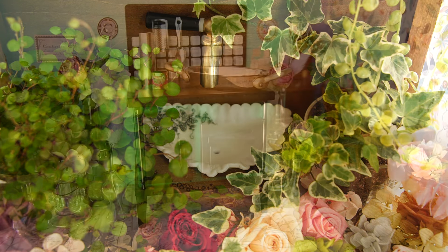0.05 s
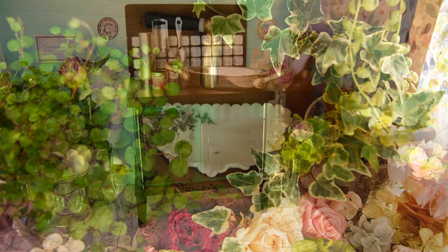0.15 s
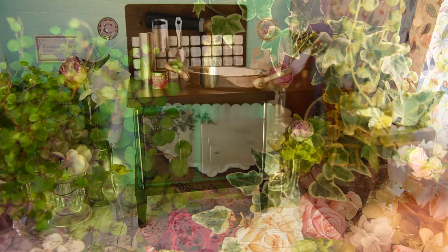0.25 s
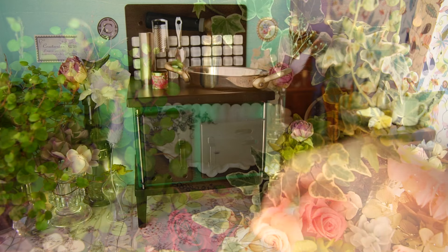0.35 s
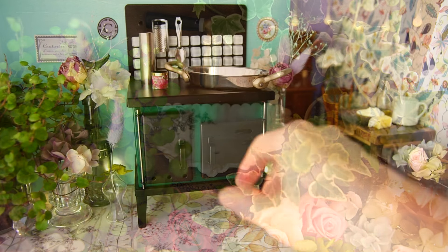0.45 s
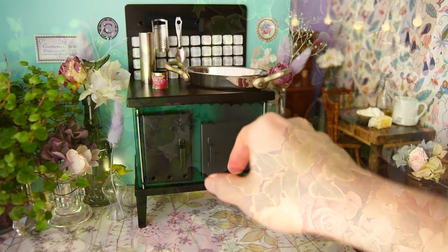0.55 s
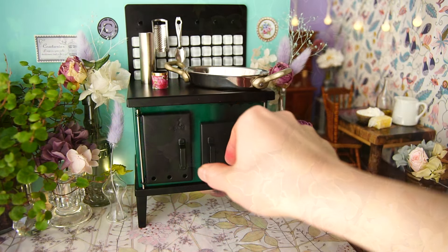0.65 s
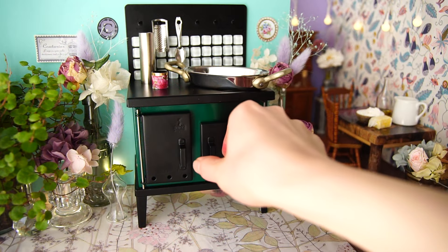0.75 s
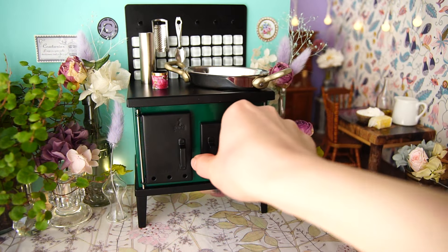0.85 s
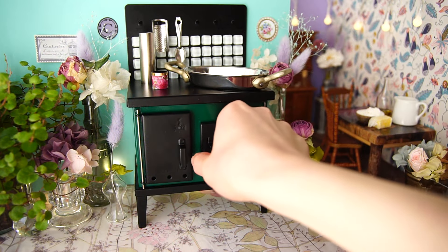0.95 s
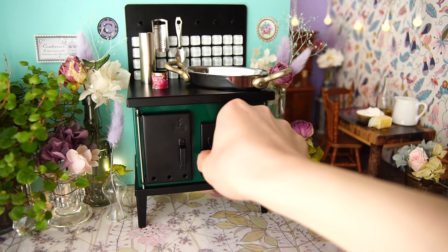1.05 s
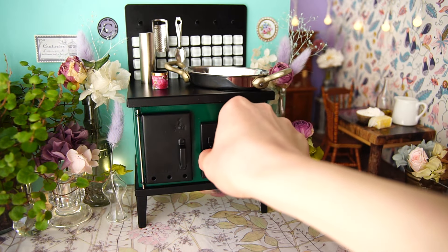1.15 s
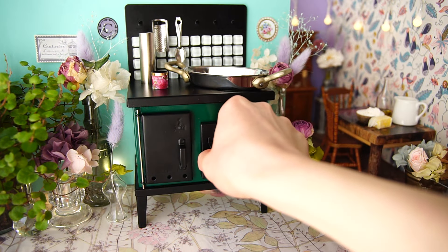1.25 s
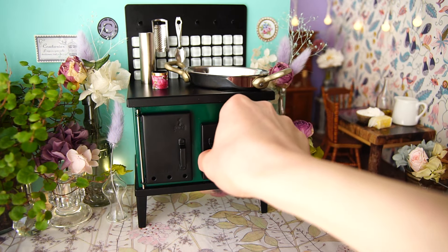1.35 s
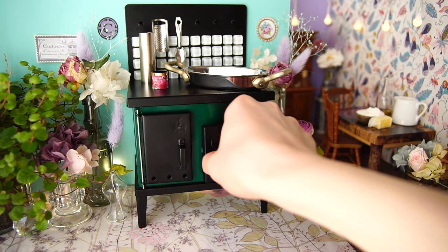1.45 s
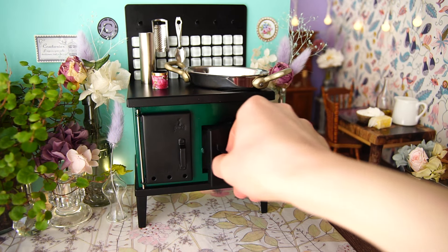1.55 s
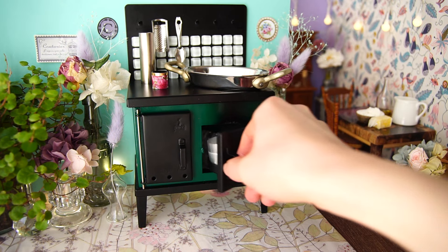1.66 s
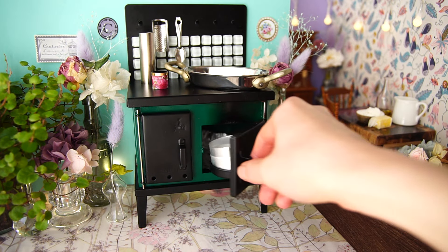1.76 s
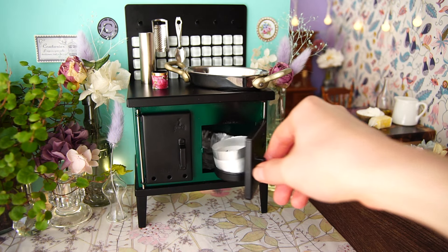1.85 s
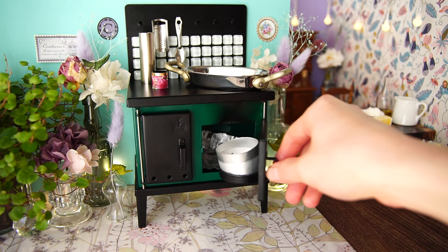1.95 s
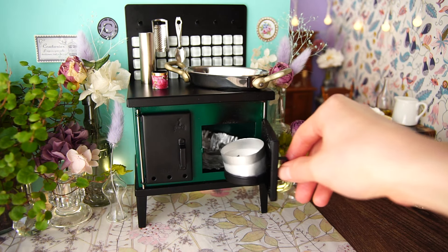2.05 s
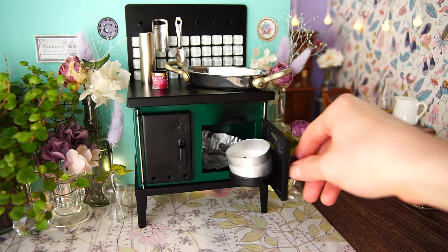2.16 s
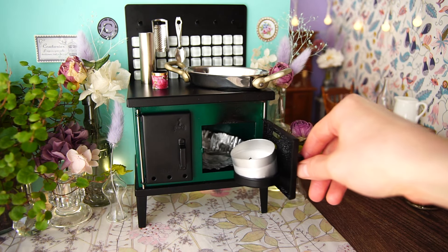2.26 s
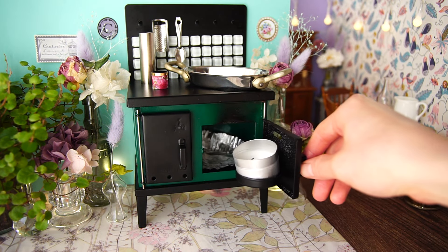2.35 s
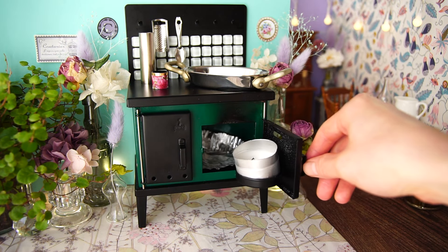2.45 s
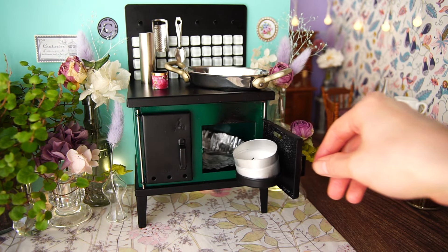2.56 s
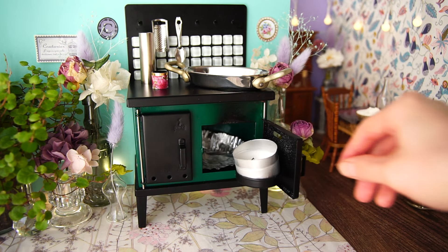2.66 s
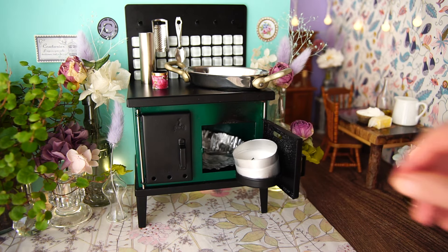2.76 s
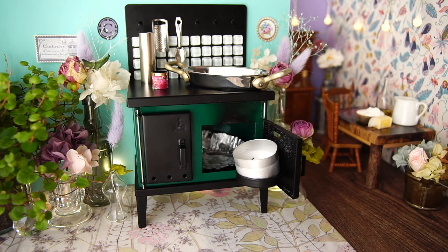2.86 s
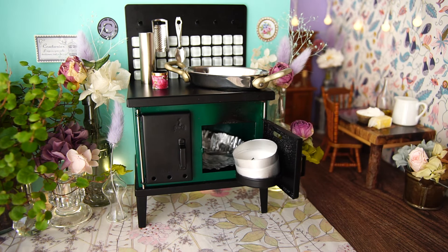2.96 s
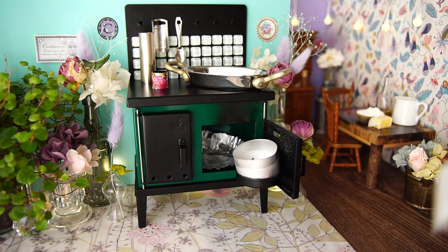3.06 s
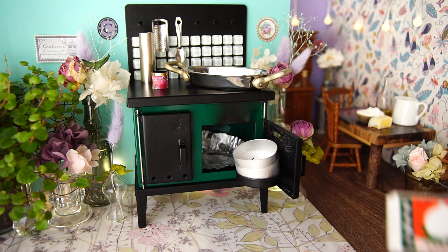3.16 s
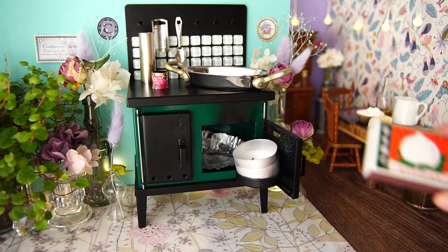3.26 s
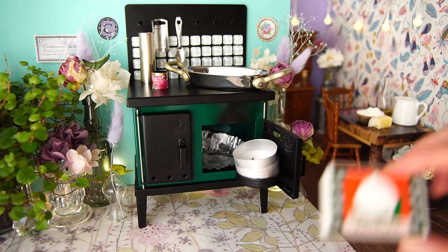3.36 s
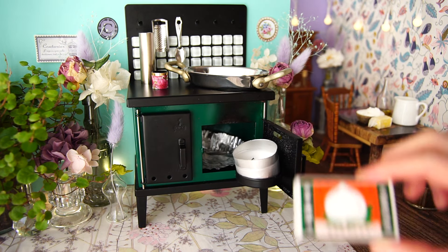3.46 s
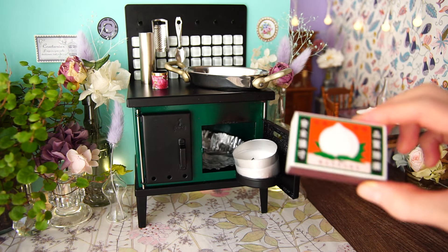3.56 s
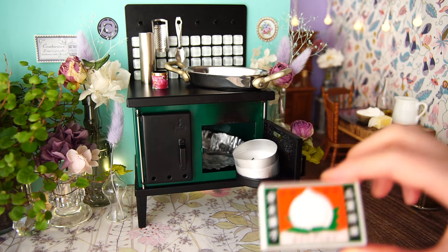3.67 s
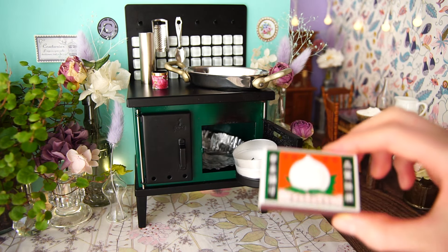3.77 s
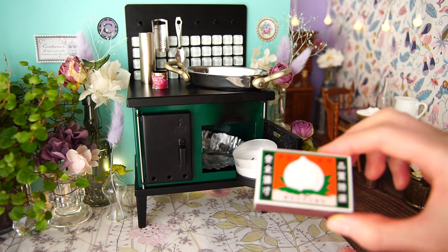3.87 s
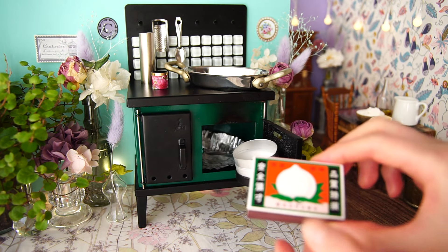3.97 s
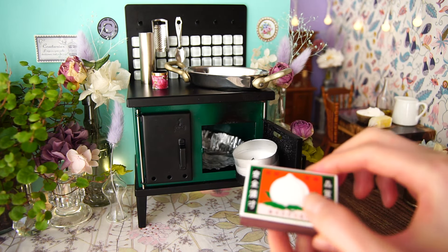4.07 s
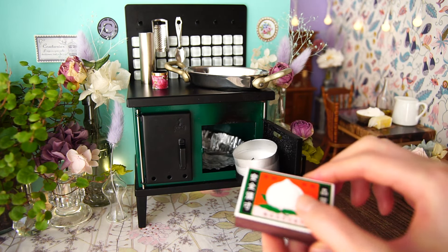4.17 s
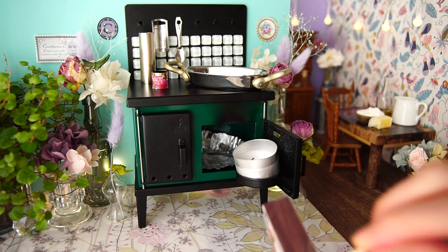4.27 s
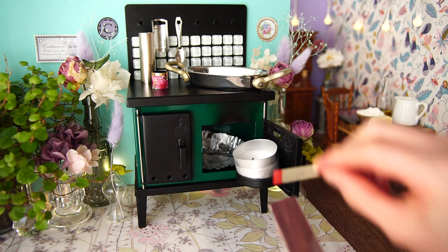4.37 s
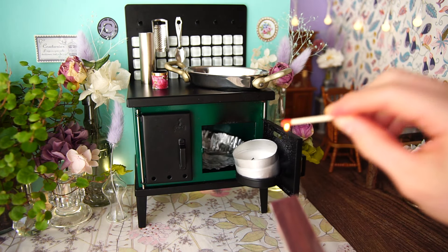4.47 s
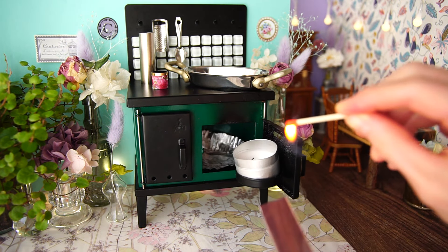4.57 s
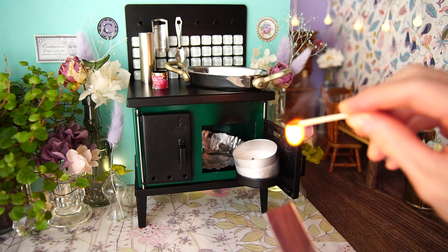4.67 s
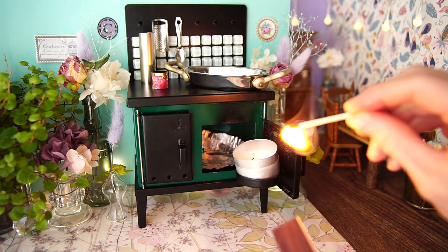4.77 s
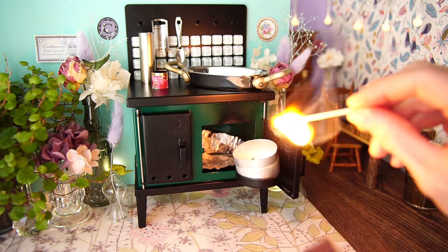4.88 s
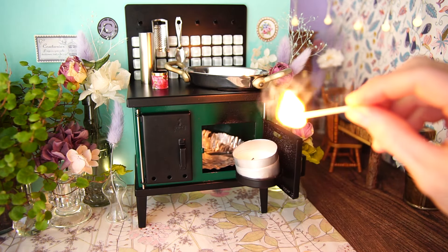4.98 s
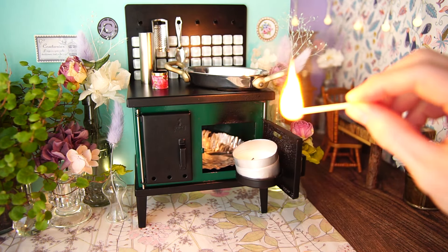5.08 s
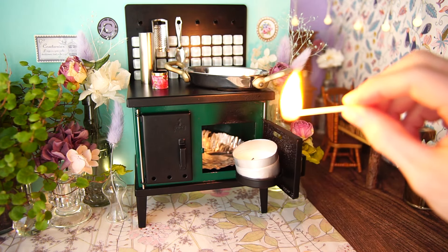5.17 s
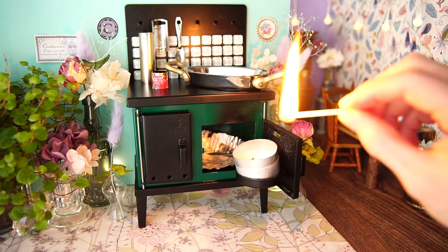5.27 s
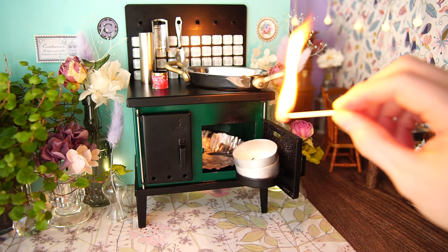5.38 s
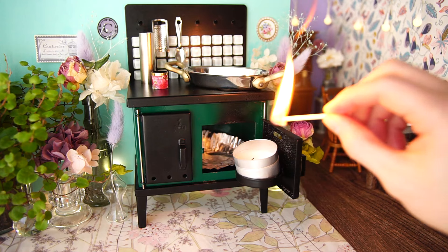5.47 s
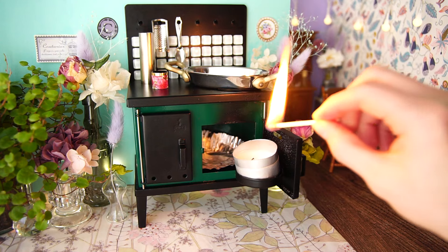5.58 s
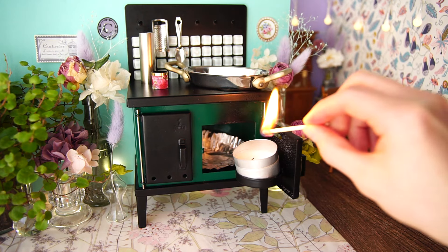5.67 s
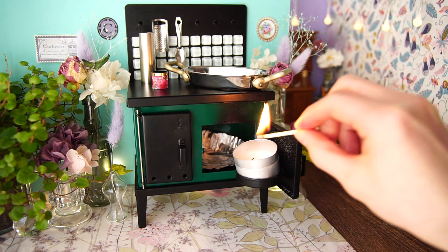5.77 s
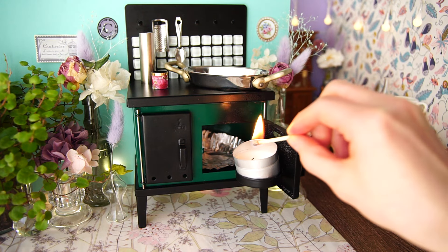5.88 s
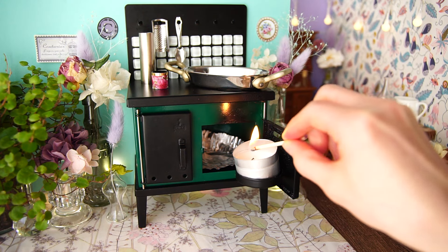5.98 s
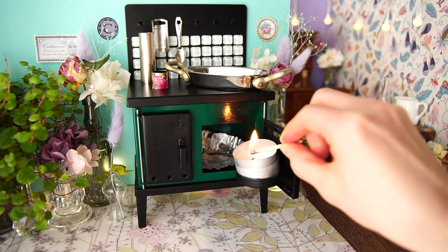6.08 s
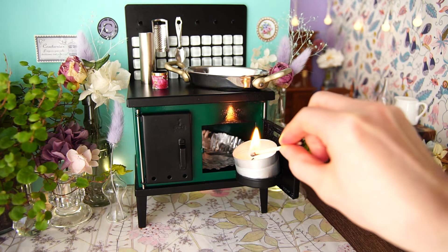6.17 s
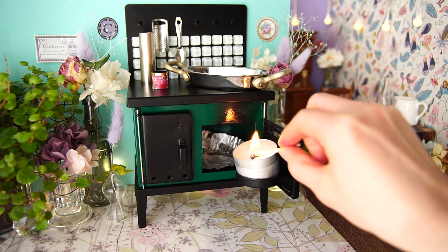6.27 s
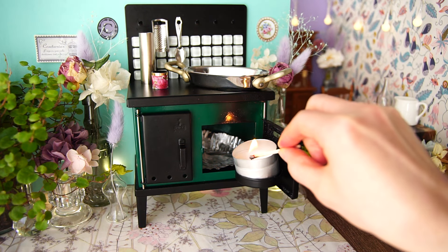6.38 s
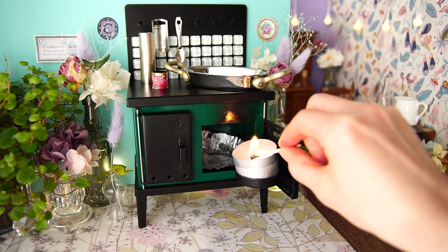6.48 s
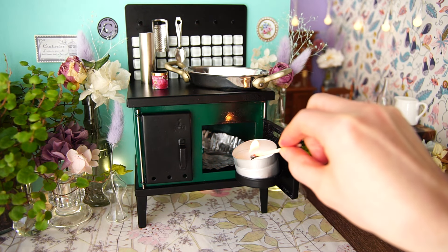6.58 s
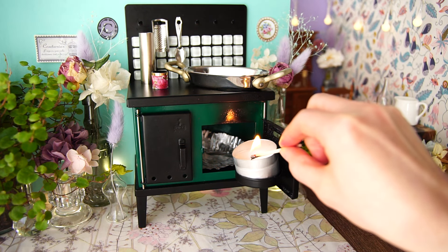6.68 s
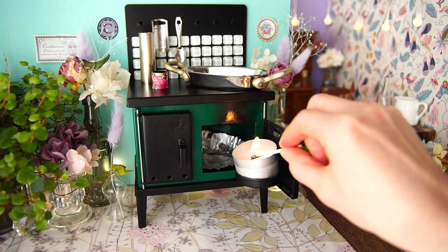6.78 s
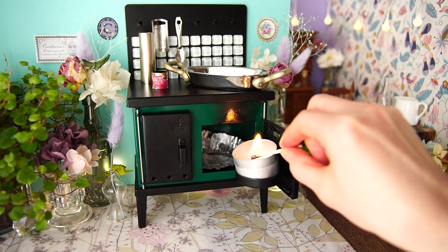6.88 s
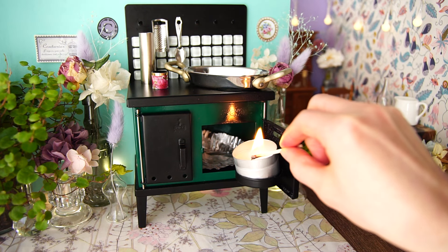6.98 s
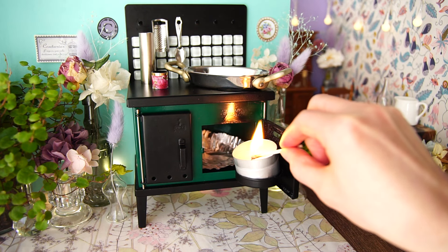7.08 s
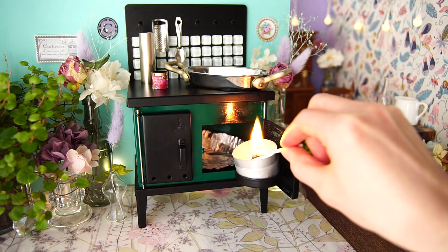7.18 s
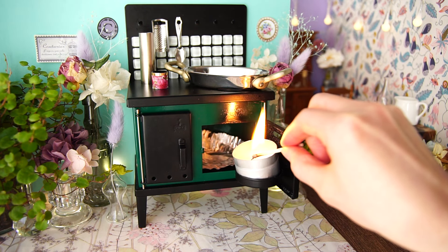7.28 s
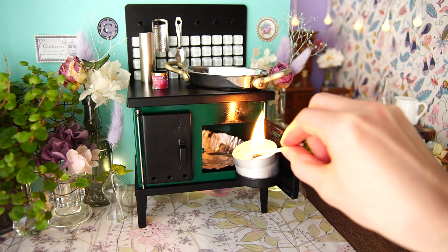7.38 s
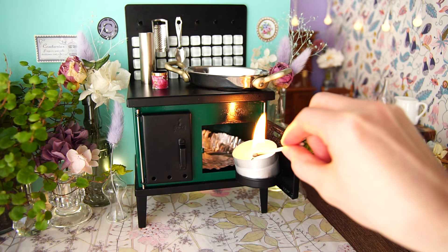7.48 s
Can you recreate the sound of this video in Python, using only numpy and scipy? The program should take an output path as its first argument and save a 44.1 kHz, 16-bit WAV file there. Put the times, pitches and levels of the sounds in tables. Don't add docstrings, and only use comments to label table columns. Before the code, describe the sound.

A small iron door unlatches and creaks, a matchbox rattles three times, then a match scrapes, flares with crackle and hisses softly in a quiet room.

```python
import sys
import numpy as np
from scipy import signal
from scipy.io import wavfile
from scipy.ndimage import uniform_filter1d, map_coordinates

SR = 44100
rng = np.random.default_rng(int(sys.argv[2]) if len(sys.argv) > 2 else 0)


def elevation(decibels):
    levels = np.asarray(decibels, float)
    return 10 ** (levels / 20)


def dump(signal):
    limited = np.clip(np.atleast_2d(signal).T, -1, 1)
    pcm = np.round(limited * 32767).astype(np.int16)
    wavfile.write(sys.argv[1], SR, pcm)


N = 332098
T = np.arange(N) / SR


def noise():
    return rng.standard_normal(N)


def evened(x):
    return x / np.sqrt(np.mean(x ** 2) + 1e-20)


def between(start, end, part):
    return start + (end - start) * part


def curve(table, t):
    return np.interp(t, *np.transpose(table))


def read(points, hz):
    f, value = np.transpose(points)
    return np.interp(np.log(hz + 1), np.log(f + 1), value)


def controls(table):
    before = (table[0][0] - 1e-3, -140, *table[0][2:])
    after = (table[-1][0] + 1e-4, -140, *table[-1][2:])
    s, *columns = np.transpose([before, *table, after])
    return [np.interp(T, s, column) for column in columns]


def swells(rows):
    level_db = np.full(N, -140.)
    for s, hold, db, attack, release in rows:
        rising = (s - T) / abs(attack)
        falling = (T - s - abs(hold)) / abs(release)
        edge = np.maximum(np.maximum(rising, falling), 0)
        level_db = np.maximum(level_db, db - 20 * edge)
    return level_db


def colour(x, points, peaks=()):
    hz = abs(np.fft.fftfreq(8192, 1 / SR))
    gain = elevation(read(points, hz))
    for centre_hz, width, db in peaks:
        gain = gain * (1 + (elevation(db) - 1) / (1 + (2 * (hz - centre_hz) / width) ** 2))
    log_gain = np.log(gain + 1e-5)
    minimum_phase = np.exp(log_gain - 1j * signal.hilbert(log_gain).imag)
    taps = np.fft.ifft(minimum_phase).real[:4096]
    return signal.oaconvolve(x, taps / np.linalg.norm(taps))[:len(x)]


def resonate(x, hz, width):
    turn = np.exp(2j * np.pi * np.cumsum(hz * np.ones(len(x))) / SR)
    r = np.exp(-np.pi * width / SR)
    return 2 * (turn * signal.lfilter([1 - r], [1, -r], x / turn + 1e-18)).real


def high_pass(x, hz, order):
    return signal.sosfilt(signal.butter(order, hz, "high", fs=SR, output="sos"), x)


def band_pass(x, low_hz, high_hz):
    return signal.sosfilt(signal.butter(2, (low_hz, high_hz), "band", fs=SR, output="sos"), x)


def brighten(x, treble_db, hz):
    top = signal.sosfiltfilt(signal.butter(2, hz, "high", fs=SR, output="sos"), x)
    return x + (elevation(treble_db) - 1) * top


def delayed(x, ms, order=3):
    return map_coordinates(x, [np.arange(len(x)) - ms / 1000 * SR], order=order)


def grit(per_s, spread_db):
    size_db = spread_db * np.minimum(rng.exponential(1, N), 4)
    clicks = elevation(size_db) * rng.choice([-1., 1.], N)
    return evened(clicks * (rng.random(N) < per_s / SR))


def flutter(ms):
    size = max(int(ms * SR / 1000), 2)
    return evened(uniform_filter1d(uniform_filter1d(noise(), size), size))


def add_knock(mix, s, db, hz, burst_db, t60, cycles=1000):
    t = np.arange(4000) / SR
    decay_db = -60 * t * max(1 / t60, hz / cycles)
    onset = 1 - np.exp(-t * hz * 4.8)
    ring = np.sin(2 * np.pi * hz * t) * elevation(decay_db) * onset
    burst = elevation(burst_db - 15.0 - 60 * t / t60) * rng.standard_normal(4000)
    part = mix[:, round(s * SR):][:, :4000]
    part += (elevation(db) * np.array([ring / abs(ring).max(), burst]))[:, :part.shape[1]]


# time in seconds, gain from 0 to 1.
ROOM_FADE = [(0, 0.6), (.15, 0.2), (.212, 0), (.222, 0.05), (.3, 0.19), (.55, 0.65), (.9, 1.)]
# frequency in Hz, level in dB per Hz.
ROOM_AIR = [(12, -48.5), (20, -10), (86, -0.5), (138, -6), (168, -2), (399, -10.5), (527, -8), (624, -13.5),
            (1030, -18), (1960, -25), (2320, -25), (4540, -27), (12500, -28.5), (14300, -28.5),
            (16000, -30.5)]
# frequency in Hz, width in Hz, lift in dB.
APPLIANCE_HUMS = [(74.2, 26, 7), (164.8, 4.6, 9), (237, 8.7, 3.5), (523.6, 24, 8.5), (582.2, 5.76, 13)]


def room_tone():
    air = evened(colour(noise(), ROOM_AIR, APPLIANCE_HUMS))
    air = elevation(-63 + 0.8 * flutter(60.)) * air
    whine_hz = 13906 + 1.5 * flutter(60.)
    whine = elevation(-82) * np.sin(2 * np.pi * np.cumsum(whine_hz) / SR)
    return (air + whine) * curve(ROOM_FADE, T)


# frequency in Hz, width in Hz, level in dB.
DOOR_MODES = [(293, 30, -4.5), (680, 140, -2.5), (991, 23, -2.5), (1740, 160, -10), (2320, 42, -16),
              (2990, 81, -13.5), (3700, 76, -24), (4300, 76, -19), (4700, 90, -23), (5920, 130, -24),
              (7300, 160, -24.5)]
# frequency in Hz, width in Hz, level in dB.
PIN_MODES = [(2750, 55, -7), (4140, 44, -3), (5260, 55, -9), (5750, 37, -3), (6770, 66, -4), (8810, 50, -2),
             (9400, 90, -4)]
# time in seconds, peak in dB, pitch in Hz, burst in dB,
# time to fall 60 dB in seconds.
LATCH_TAPS = [
    (0.189, -79.5, 2420, 25.5, 0.021),
    (.785, -39.5, 730, -3, 0.055),
    (0.788, -68, 288, -20, 0.053),
    (.788, -54.5, 3010, -20, 0.038),
    (1.161, -64, 1510, 8, 0.063),
    (1.364, -50, 740, -9, 0.036),
    (1.383, -61.5, 3700, 13, 0.088),
    (1.395, -51, 693, -20, 0.18),
    (1.4, -49, 383, -20, 0.026),
]
# start in seconds, hold in seconds, level in dB, release in seconds.
HINGE_RUBS = [(0.794, 0.00043, -47.5, 0.043), (0.802, 0.04, -59.5, .035), (0.843, 0.1, -60.5, 0.016),
              (.94, 0.064, -71, .05), (1.156, 0, -67.5, 0.51), (1.28, 0.055, -65.5, .05),
              (1.302, 0.018, -61.5, 0.058), (1.367, 0.032, -59, 0.028), (1.42, 0.003, -73, 0.14)]
# start in seconds, hold in seconds, level in dB, attack and release in seconds.
DOOR_SWING = [
    (2.325, 0.092, -82, 0.053, .04),
    (2.425, 0.024, -76, 0.033, .02),
]
# start in seconds, hold in seconds, level in dB, attack and release in seconds.
BOLT_SLIDES = [(.858, 0.076, -74.5, .025, .012), (1.29, 0.033, -82, .02, .015)]


def door():
    slips = grit(3000., 2.5)[:3 * SR]
    length = len(slips)
    rasp = colour(slips, [(200, -4), (800, 9.0), (2000, -7.0), (5000, -34.0), (10000, -44)])
    iron, pin, bolt = np.zeros((3, length))
    for hz, width, db in DOOR_MODES:
        iron += elevation(db) * evened(resonate(resonate(slips, hz, width), hz, 3 * width))
        if hz > 2600:
            bolt += elevation(db) * evened(resonate(slips, hz, 2 * width))
    for hz, width, db in PIN_MODES:
        awake = (T[:length] > 2.4) | (hz < 4500)
        pin += elevation(db) * evened(resonate(slips, hz, width)) * awake
    rub_db = swells([(s, hold, db, 0.0041, release) for s, hold, db, release in HINGE_RUBS])
    moving = elevation(rub_db[:length] - 5.5) * (iron + rasp)
    moving = moving + elevation(swells(DOOR_SWING)[:length]) * evened(pin)
    moving = moving + elevation(swells(BOLT_SLIDES)[:length]) * evened(bolt)
    taps = np.zeros((2, N))
    for row in LATCH_TAPS:
        add_knock(taps, *row)
    thuds = colour(taps[1], [(300, -1), (1000, 7), (4000, -2), (12000, -17)])
    return taps[0] + thuds + np.pad(moving, (0, N - length))


# frequency in Hz, width in Hz, level in dB.
TRAY_MODES = [(1080, 51, -11), (1550, 150, 5.5), (2090, 320, -8), (2850, 300, 1.5), (4290, 240, -3),
              (5400, 140, -14.5), (9680, 500, -20)]
# frequency in Hz, level in dB per Hz.
BOX_TONE = [(150, -65), (400, -25), (700, -7), (1700, -4.5), (2850, -9.5), (3980, -12), (5440, -10.5),
            (7320, -19.5), (11200, -20), (15600, -29.5)]


def cardboard(x, lift_db):
    peaks = [(hz, width, lift_db + 0.12 * db) for hz, width, db in TRAY_MODES]
    return colour(x, BOX_TONE, peaks)


# time in seconds, peak in dB, pitch in Hz.
STICK_KNOCKS = [(3.0712, -13.5, 2750), (3.0738, -20, 3100), (3.1188, -8, 2670), (3.1261, -15, 1680),
                (3.1336, -10, 2910), (3.1385, -21.5, 1780), (3.145, -26, 1560), (3.3316, -22, 1460),
                (3.3353, -17.5, 1620), (3.3388, -21.5, 1860), (3.3425, -6.5, 2990), (3.347, -25, 1610),
                (3.3511, -16.5, 2990), (3.3552, -20.5, 1590), (3.412, -15, 1640), (3.4174, -15.5, 1670),
                (3.4193, -21, 1070), (3.4229, -15, 2450), (3.4337, -16.5, 1530), (3.6154, -25, 1980),
                (3.6353, -13, 2900), (3.6433, -32, 1270), (3.65, -17, 3030), (3.6643, -21.5, 1640),
                (3.684, -21.5, 5280), (3.6878, -26.5, 5020), (3.692, -29.5, 1340), (3.6952, -17, 2740),
                (3.6995, -8, 2820), (3.7029, -16.5, 1550), (3.705, -12.5, 1640), (3.709, -24.5, 1350),
                (3.7104, -25, 1370), (3.7179, -16.5, 1550), (3.719, -19.5, 1160), (3.7234, -23, 1550),
                (3.734, -29, 1560),
                (3.0758, -31, 2170), (3.079, -40, 1810), (3.0888, -41, 3620), (3.0969, -44, 4950),
               (3.0991, -43, 2000), (3.1049, -39, 5210), (3.1517, -36, 1510), (3.163, -37, 1420),
               (3.1705, -39, 860), (3.1798, -38.5, 1100), (3.183, -40.5, 1460), (3.1866, -36, 1120),
               (3.1902, -33, 1490), (3.1943, -43, 1360), (3.2874, -43.5, 1720), (3.289, -36, 2130),
               (3.2977, -43, 2090), (3.3033, -38.5, 1100), (3.31, -31, 1510), (3.3123, -34, 1270),
               (3.3164, -34, 2860), (3.3206, -35, 1210), (3.3265, -25, 1510), (3.3627, -34, 2950),
               (3.3674, -32.5, 2730), (3.3714, -42, 2610), (3.3789, -46.5, 2170), (3.3902, -38, 1340),
               (3.394, -49.5, 1120), (3.4007, -35.5, 1570), (3.4031, -31.5, 1810), (3.405, -34, 1790),
               (3.4089, -30.5, 1570), (3.4396, -28.5, 2200), (3.4431, -31, 2860), (3.4471, -42.5, 1740),
               (3.4495, -43.5, 1570), (3.4528, -41, 1490), (3.458, -34, 1530), (3.4624, -32.5, 1550),
               (3.47, -39, 1650), (3.4725, -44.5, 1460), (3.4817, -38, 1575), (3.4875, -32.5, 1360),
               (3.4912, -43.5, 1340), (3.4925, -37.5, 1610), (3.6047, -35.5, 1205), (3.608, -40.5, 1250),
               (3.6251, -37.5, 2000), (3.6266, -39.5, 880), (3.6533, -28.5, 1570), (3.6565, -40, 1460),
               (3.6619, -37.5, 3060), (3.673, -36.5, 1360), (3.677, -28.5, 1250), (3.6798, -26, 5080),
               (3.728, -31.5, 1030), (3.7409, -39.5, 1510), (3.7427, -43, 1460), (3.7478, -47, 1590)]
# start in seconds, hold in seconds, level in dB,
# attack in seconds, release in seconds.
HEAP_SLIDES = [(3.0722, .001, -32.5, 0.0007, 0.005), (3.105, 0.0073, -33, 0.017, .02),
               (3.128, 0.014, -23, 0.025, 0.013), (3.19, 0, -42.5, 0.051, .075),
               (3.288, 0.011, -43.5, 0.00073, 0.066), (3.342, 0, -26, 0.042, 0.042),
               (3.4123, 0.016, -20.5, 0.001, 0.013), (3.411, 0, -30, .03, .01),
               (3.482, 0.013, -47, 0.076, .1), (3.587, .004, -55, .01, .03),
               (3.618, 0.0055, -38.5, .05, 0.027), (3.638, 0.0071, -31, 0.0098, 0.044),
               (3.701, 0.0085, -22, 0.025, 0.02), (3.75, 0.036, -50.5, 0.055, 0.12)]


def rattle():
    level_db = swells(HEAP_SLIDES)
    tumble = cardboard(grit(5000., 2.5) * elevation(2. * flutter(2.5)), 5.)
    packed = T > 3.672
    tumble = tumble + packed * resonate(tumble, 5450., 300.)
    knocks = np.zeros((2, N))
    for s, db, hz in STICK_KNOCKS:
        end_wall = 2400 < hz < 3600
        rustle_db, turns = (1.5, 9.5) if end_wall else (8.5, 9.)
        add_knock(knocks, s, db - 2.5, hz, rustle_db, .014, cycles=turns)
        stick_hz = between(5080, 6700, rng.random() ** 2)
        add_knock(knocks, s, db - 13.5, stick_hz, 0., .006, cycles=15.)
    click = band_pass(knocks[0], 650., 8000.)
    slide_db = level_db - 6.5 - 0.17 * np.maximum(level_db + 31, 0)
    sliding = elevation(slide_db) * brighten(evened(tumble), 2.0 + 0.25 * (level_db + 32.0), 4730.0)
    return sliding + click + cardboard(knocks[1], 6.8)


# time in seconds, peak in dB, pitch in Hz,
# burst in dB, time to fall 60 dB in seconds.
BOX_TOUCHES = [(4.1895, -41, 1490, 4, 0.031), (4.3088, -40, 3600, 12, 0.018),
               (4.3097, -28.5, 3080, 9.5, 0.046), (4.3881, -26, 1900, 16, 0.018),
               (4.39, -26, 834, 0.5, 0.18), (4.411, -22, 1740, 11, 0.028), (4.413, -22, 3560, 9, 0.0044),
               (4.3888, -17.5, 4700, 7.5, 0.011), (4.3104, -30, 1630, 4, .02), (4.397, -30, 1620, -8, .02),
               (4.4032, -32, 1700, -8, .02), (4.4204, -29, 1640, 4, 0.016), (4.43, -38, 1600, -7, .02),
               (4.44, -38, 1610, -20, 0.017), (4.4518, -25.5, 1880, 4.5, 0.021),
               (4.4573, -31, 1750, -3, .02), (4.459, -27.5, 4130, 5, 0.029), (4.463, -32, 4100, -9, .03),
               (4.466, -39, 1750, 15, 0.018), (4.478, -32, 520, -28, 0.0058),
               (4.481, -34.5, 620, -28, 0.0076)]
# time in seconds, level in dB, chatter pitch in Hz.
HEAD_STROKE = [(4.3335, -44, 4200), (4.3358, -23.5, 4150), (4.343, -25, 4050), (4.352, -24, 4400),
               (4.3615, -25.5, 4500), (4.3622, -28, 2600), (4.374, -22.5, 3600), (4.3755, -23, 2700),
               (4.385, -29, 2600), (4.389, -38, 3000)]
# frequency in Hz, level in dB per Hz.
STRIP_TONE = [(120, -86), (200, -54), (617, -13.5), (860, -1.5), (1270, -15.5), (1500, 6), (1900, -1),
              (4530, 2), (5300, -1), (9000, -11.5), (15000, -16), (16500, -10)]
# start in seconds, hold in seconds, level in dB,
# attack in seconds, release in seconds.
STICK_BRUSHES = [
    (4.208, 0, -72, 0.046, .01),
    (4.31, 0, -56, .001, .012),
    (4.33, 0.0048, -49, 0.0081, .01),
    (4.412, 0, -38.5, 0.0071, .032),
]
# start in seconds, end in seconds, from Hz, to Hz, gain.
STICK_SQUEALS = [
    (4.336, 4.35, 7000, 6900, .4),
    (4.362, 4.385, 7600, 10200, .3),
    (4.364, 4.381, 5600, 7100, .5),
    (4.374, 4.388, 13000, 15000, .25),
]


def strike():
    level_db, chatter_hz = controls(HEAD_STROKE)
    level_db = np.maximum(level_db, swells(STICK_BRUSHES))
    grains = grit(16000., 1.5) * elevation(flutter(1.2))
    scrape = evened(colour(grains, STRIP_TONE))
    chatter = resonate(resonate(grains, chatter_hz, 420.), chatter_hz, 900.)
    box_hum = (T > 4.352) * evened(resonate(grains, 845.0, 170.0))
    scrape = scrape + 1.15 * evened(chatter) + 0.6 * box_hum
    for start, end, from_hz, to_hz, gain in STICK_SQUEALS:
        sounding = np.sin(np.pi * np.clip((T - start) / (end - start), 0, 1)) ** .5
        squeal_hz = np.interp(T, (start, end), (from_hz, to_hz))
        scrape = scrape + gain * sounding * evened(resonate(grains, squeal_hz, 450.))
    knocks = np.zeros((2, N))
    for row in BOX_TOUCHES:
        add_knock(knocks, *row, cycles=16)
    return elevation(level_db) * evened(scrape) + knocks[0] + cardboard(knocks[1], 5.0)


# time in seconds, hiss level in dB.
FLAME_SIZE = [(4.4, -57), (4.47, -50.5), (4.5, -49.5), (4.6, -49), (4.69, -46.5), (4.86, -44),
              (4.94, -41.5), (5.21, -44.5), (5.372, -50), (5.386, -68), (5.43, -61.5), (5.47, -71),
              (5.7, -78.5), (6.0, -76.5), (7.53, -76)]


def flame_roar(size_db):
    roar = evened(colour(noise(), [(25, -12.0), (70, 3.0), (200, 3.5), (500, -13.5), (900, -16.0)]))
    roar_db = -59.5 + 0.6 * (size_db + 51.5) + 2. * flutter(22.0)
    return roar * elevation(roar_db) * (T > FLAME_SIZE[0][0])


# frequency in Hz, level in dB per Hz.
HISS_TONE = [(100, -18.5), (340, -6), (470, 1.5), (580, -8), (820, -3), (2100, -6), (2460, -5), (4400, -6),
             (5600, -7.5), (8000, -10), (11500, -16.5), (13500, -26), (15800, -43)]
# time in seconds, length in seconds, lift in dB, treble lift in dB.
GAS_JETS = [(4.452, 0.06, -1.5, 5), (4.548, 0.031, 3, 13), (4.619, 0.017, 3.5, 14.5), (4.651, 0.023, 7, 1),
            (4.738, 0.026, 0.5, 10.5), (4.817, 0.06, 0, 9.5), (4.892, 0.021, -0.5, 14),
            (4.936, 0.029, 0.5, 8), (5.105, 0.074, 0.5, -7), (5.18, 0.011, -1.5, 15), (5.282, 0.015, 5, 6),
            (5.37, 0.028, 3.5, 5), (7.152, 0.039, 3.5, 3.5)]


def gas_hiss(size_db):
    lift_db, bright_db = np.zeros((2, N))
    for s, length, lift, treble_lift in GAS_JETS:
        gust = np.exp(-((T - s) / length) ** 2)
        lift_db += lift * gust
        bright_db += treble_lift * gust
    treble_db = -21.5 - 0.3 * (size_db + 51.5) + bright_db + 0.77 * flutter(11.0)
    jets = noise() + .6 * grit(2200., 2.9)
    gusts = elevation(0.94 * flutter(3.5) + 1.15 * flutter(16.0))
    hiss = evened(colour(jets * gusts, HISS_TONE))
    return elevation(size_db + lift_db - 1.5) * brighten(hiss, .8 * (treble_db + 11), 6000.)


# time in seconds, peak in dB, pitch in Hz.
GRAIN_SPITS = [(4.523, -38, 4240), (4.54, -35, 4500), (4.6221, -31, 3040), (4.6258, -29, 3980),
               (4.654, -30, 6400), (4.886, -32, 4000), (4.8952, -28, 4840), (4.9007, -27, 2500),
               (4.9038, -28, 4300), (4.911, -40, 4610), (4.936, -32, 4010), (4.9512, -30, 1360),
               (4.9733, -30, 2900), (4.9893, -28, 3200), (5.0114, -30, 4970), (5.039, -24, 3600),
               (5.0493, -23, 2200), (5.0665, -33, 3000), (5.0772, -26, 2600), (5.2076, -25, 2880),
               (5.215, -33, 1310), (5.2185, -37, 2500), (5.2876, -33, 4000), (5.3012, -26, 1800),
               (5.5107, -23, 7000)]
# time in seconds, peak in dB, pitch in Hz, burst in dB.
STICK_POPS = [(5.4185, -57, 4200, -7), (5.485, -50, 1360, 12), (5.5105, -43, 2470, 17.5),
              (6.006, -49.5, 2980, -5), (6.275, -57, 3000, -7), (6.339, -56, 7700, -2),
              (6.367, -46.5, 2850, -7), (6.367, -51.5, 556, -11), (6.4118, -46, 2960, -9),
              (6.414, -52.5, 1530, -8), (6.764, -60, 3120, 10), (6.821, -69, 8900, 0),
              (7.322, -57, 3330, 7)]
# time in seconds, peak in dB, pitch in Hz.
STEAM_PUFFS = [(6.328, -65, 2800), (6.4, -60, 4800), (6.45, -64.5, 5050), (7.141, -66.5, 2870)]
# time in seconds, peak in dB, pitch in Hz.
THUMP_AND_PINGS = [
    (5.511, -53.5, 84),
    (6.333, -65.5, 1167),
    (6.451, -68, 1200),
]


def crackle():
    cracks = np.zeros((2, N))
    for s, db, hz in GRAIN_SPITS:
        add_knock(cracks, s, db - 1.5, hz, -22, .012, cycles=3.8)
    for row in STICK_POPS:
        add_knock(cracks, *row, 0.012, cycles=3.8)
    for row in STEAM_PUFFS:
        add_knock(cracks, *row, 11.5, 0.12, cycles=12)
    for row in THUMP_AND_PINGS:
        add_knock(cracks, *row, -20, 0.11, cycles=200)
    return cracks[0] + colour(cracks[1], [(300, 7), (900, 1.0), (1500, -13.5), (5000, 3.5), (15000, -23.5)])


# time in seconds, share of the way from 0 to 1.
CARRY_WAY = [
    (5.5, 0),
    (5.65, .06),
    (5.9, .27),
    (6.02, .45),
    (6.14, .8),
    (6.28, 1),
]
# path in ms while held, path in ms when lowered, gain while held, gain when lowered.
SURFACE_ECHOES = [
    (0.241, 0.29, 0.024, 0.0078),
    (0.658, 0.342, 0.077, 0.6),
    (1.028, 0.64, 0.14, 0.19),
    (1.45, 1.36, .36, 0.12),
    (2.801, 1.31, 0.22, 0.11),
]
# frequency in Hz, width in Hz, gain.
STOVE_HOLLOW = [(4110, 200, 1.3), (4730, 200, .85)]
# time in seconds, path in ms.
FINGER_PATH = [(4.5, 1.0), (4.8, 1.18), (5.0, 1.2), (5.2, 1.12), (5.4, 1.02)]
# frequency in Hz when open, frequency in Hz when closed.
GAP_BANDS = [
    (3900, 7600),
    (6200, 11100),
]
# time in seconds, frequency in Hz.
HAND_CANCEL = [(4.5, 10000), (4.93, 9800), (5.04, 12000), (5.4, 13000)]


def near_surfaces(direct, t):
    way = np.clip(curve(CARRY_WAY, t), 0, 1)
    turned = np.clip((t - 5.5) / .15, 0, 1)
    lean = 1 + .07 * np.exp(-((t - 5.0) / .35) ** 2)

    treble = brighten(high_pass(direct, 1200., 1), 4 * (1 - turned), 9000.)
    plate_ms = between(.5, .265, np.sqrt(way))
    echoes = .35 * turned * delayed(brighten(treble, 18.0, 3700.0) / 4, plate_ms)
    for hz, width, gain in STOVE_HOLLOW:
        echoes = echoes + (1 - turned) * gain * resonate(direct, hz / lean ** .3, width)
    for held_ms, lowered_ms, held, lowered in SURFACE_ECHOES:
        waver_ms = .022 * (1 - way) * flutter(200.)[-len(t):]
        ms = lean * held_ms + (lowered_ms - held_ms) * np.sqrt(way) + waver_ms
        echoes = echoes + between(held, lowered, turned) * delayed(treble, ms)
    fingers = delayed(high_pass(direct, 9500., 4), curve(FINGER_PATH, t))
    echoes = echoes + .75 * (1 - turned) * fingers

    low_hz = between(*GAP_BANDS[0], way)
    high_hz = between(*GAP_BANDS[1], 1 - (1 - way) ** 2.1)
    span_hz = high_hz - low_hz
    low_band = (1.8 - .8 * way) * resonate(direct, low_hz, 750)
    high_band = (.7 + 1.1 * np.sqrt(way)) * resonate(direct, high_hz, 1000)
    middle = resonate(direct, low_hz + .62 * span_hz, 350.)
    ridge = resonate(direct, between(8300, 13000, np.sqrt(way)), 700.)
    gap = 3.565 * turned * (low_band + high_band) + 2.5 * turned * (1 - way) * (middle + ridge)

    close = np.clip((way - .4) / 0.048, 0, 1)
    ring = close * (3.5 * resonate(direct, 2980.0, 460.0) + 3.3 * resonate(direct, 1940.0, 220.0))
    heard = direct + echoes + gap + ring
    heard = heard - .45 * turned * delayed(heard, between(2.1, 1.36, way), order=1)
    dip_hz = np.where(turned > 0, low_hz + (.37 + .18 * way) * span_hz, curve(HAND_CANCEL, t))
    return heard - .8 * (.7 + .3 * turned) * resonate(heard, dip_hz, 900)


def flame():
    size_db = controls(FLAME_SIZE)[0]
    direct = gas_hiss(size_db) + crackle()
    lit = 7 * N // 12
    heard = near_surfaces(direct[lit:], T[lit:])
    return np.pad(heard, (lit, 0)) + flame_roar(size_db)


# frequency in Hz, time to fall 60 dB in seconds.
ROOM_DECAY = [(200, 0.75), (1000, 0.15), (4000, 0.12), (12000, 0.14)]


def reverb(x):
    taps = np.zeros(SR // 2)
    at = np.arange(150, SR // 2 - 20, 20)
    taps[at + rng.integers(0, 20, len(at))] = rng.choice([-1., 1.], len(at))
    hz, t, z = signal.stft(taps, SR, nperseg=256)
    dying = elevation(-60 * t / read(ROOM_DECAY, hz)[:, None])
    tail = signal.istft(z * dying, SR, nperseg=256)[1]
    return signal.oaconvolve(x, tail / np.linalg.norm(tail))[:N]


def scene():
    near = door() + rattle() + strike() + flame()
    return (near + elevation(-14.0) * reverb(near) + room_tone())[None]


def roll_off(x):
    return signal.sosfilt(signal.butter(12, 16630, fs=SR, output="sos"), x)


def record(dry):
    limited = signal.oaconvolve(dry, signal.firwin(255, 15950, fs=SR)[None], "same")
    return roll_off(limited)


dry = scene()
out = record(dry)
dump(out)
```